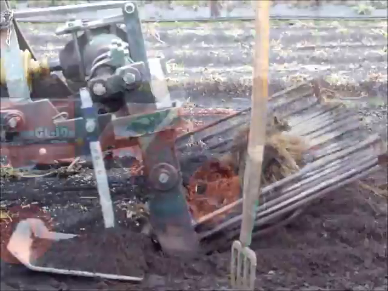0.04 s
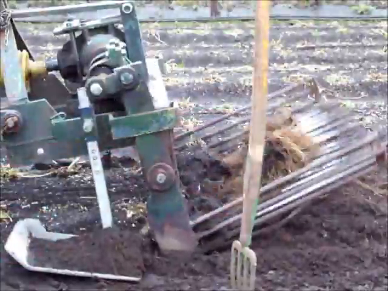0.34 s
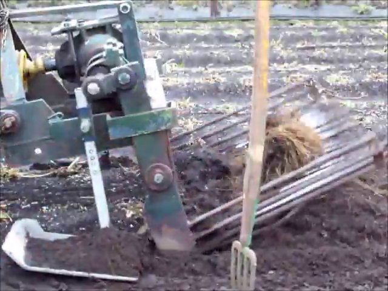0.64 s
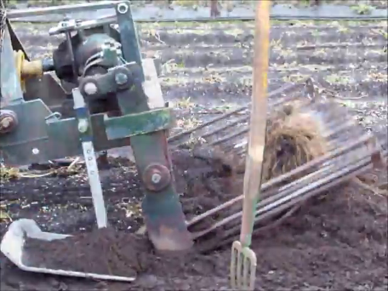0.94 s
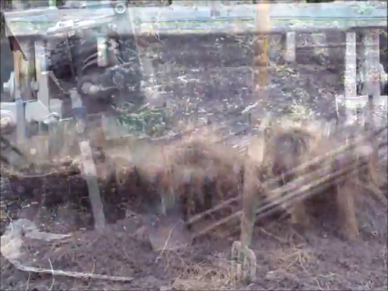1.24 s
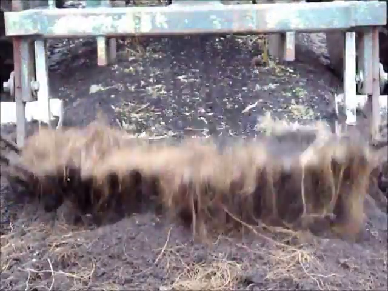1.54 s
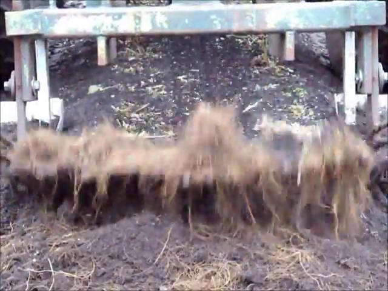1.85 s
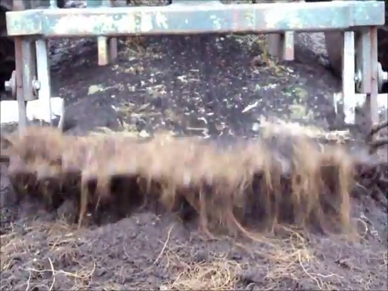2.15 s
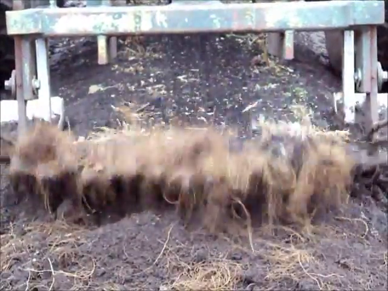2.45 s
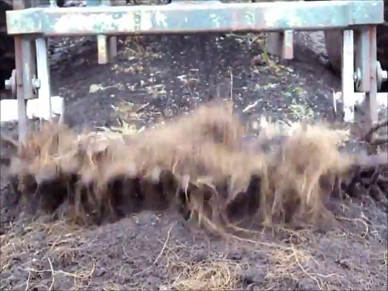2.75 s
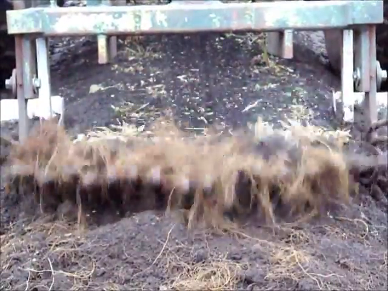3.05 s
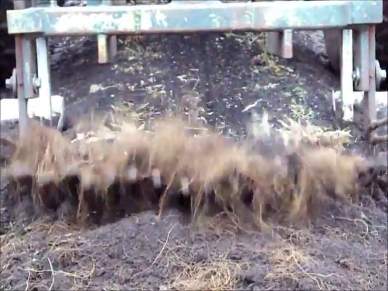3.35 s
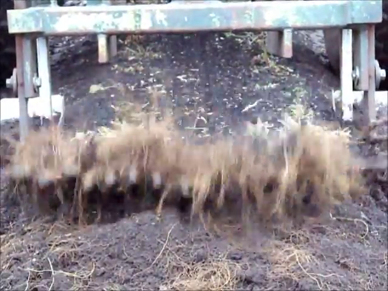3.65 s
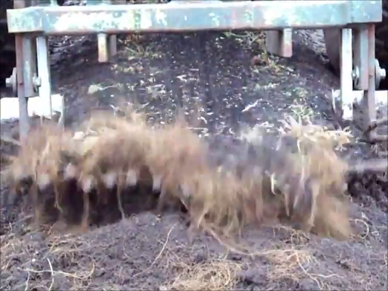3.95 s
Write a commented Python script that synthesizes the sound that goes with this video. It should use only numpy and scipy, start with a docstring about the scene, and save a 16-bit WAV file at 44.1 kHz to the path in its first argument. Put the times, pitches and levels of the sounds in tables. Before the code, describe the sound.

Rhythmic steel rattling from a farm machine sifting soil outdoors, each quick stroke ending in a hard clank. Loose pins clink over a low tractor drone and rumble, while wind thumps the microphone about a second in.

```python
"""A tractor pulls a plant lifter through a field, heard first from the side. A crank throws a grate of
steel tines up and down about three times a second, each stroke a rush of rattling steel and soil, while
the diesel drones below and wind rumbles. Loose pins clink, and the slack linkage ends each stroke with a
sharp slam. From 0.9 s the machine is also heard from behind, and after 1.5 s only from there.
Wind bumps the microphone, hardest around 1.3 s."""
import sys
import numpy as np
from scipy import signal
from scipy.fft import rfft, irfft
from scipy.io import wavfile

SR = 44100
rng = np.random.default_rng(int(sys.argv[2]) if len(sys.argv) > 2 else 0)


def unload_audio(sound):
    """Save the sound as a 16-bit wav file, at the path given as the first command line argument."""
    columns = np.transpose(np.atleast_2d(sound))
    # keep every value between -1 and 1, then stretch to whole-number steps
    steps = np.round(np.clip(columns, -1, 1) * 32767)
    wavfile.write(sys.argv[1], SR, steps.astype(np.int16))


N = 176400
T = np.arange(N) / SR
STROKE_S, ENGINE_HZ = .3036, 24.23   # engine: one cycle of all cylinders


def from_db(db):
    """Decibels to gain."""
    return 10 ** (np.asarray(db) / 20)


def rms_one(x):
    """Scale to unit power."""
    return x / np.sqrt(np.mean(x ** 2) + 1e-20)


def curve(rows, at=T):
    """Gains of each dB column, joined by straight lines."""
    s, *columns = np.transpose(rows)
    return [from_db(np.interp(at, s, c)) for c in columns]


def shape_spectrum(x, points):
    """Filter by a smooth (Hz, dB) curve; rms 1."""
    hz, db = np.transpose(points)
    bins_hz = np.maximum(np.arange(N // 2 + 1) * SR / N, 1)
    gain = from_db(np.interp(np.log(bins_hz), np.log(hz), db))
    return rms_one(irfft(rfft(x) * gain, N))


def slow_drift(rate_hz):
    """Slow random wander, rms about 1."""
    r = np.exp(-80 * np.pi * rate_hz / SR)
    slow = signal.lfilter([1], [1, -2 * r, r * r], rng.standard_normal(N // 40 + 2002))[2000:]
    return np.interp(np.arange(N) / 40, np.arange(len(slow)), rms_one(slow))


def one_mode(x, hz, width_hz):
    """One resonance, peak gain 1."""
    r = np.exp(-np.pi * width_hz / SR)
    feedback = [1, -2 * r * np.cos(2 * np.pi * hz / SR), r * r]
    return signal.lfilter(np.array([1, 0, -1]) * (1 - r * r) / 2, feedback, x + 1e-18)


def contacts(per_s, spread_db):
    """Random clicks, many small and a few large."""
    sizes = from_db(spread_db * np.minimum(rng.exponential(1, N), 4))
    return (rng.random(N) < per_s / SR) * sizes * rng.choice([-1, 1], N)


def burst(s, rise_s, decay_s):
    """Envelope that climbs from time s and dies away."""
    age = T - s
    return np.clip(age / rise_s, 0, 1) * np.exp(-np.clip((age - rise_s) / decay_s, 0, 30))


def steel_ring(modes, force, per_s):
    """Dense contacts ring each mode of a steel part; rms 1."""
    out = 0
    for hz, db in modes:
        hits = force * contacts(per_s, spread_db=2.5)
        out += from_db(db) * rms_one(one_mode(hits, hz, width_hz=75))
    return rms_one(out)


def load_jolts(decay_s=.0053):
    """Small impacts shake the load: a gain that leaps and sinks back; rms 1."""
    kicks = contacts(per_s=97, spread_db=2)
    energy = signal.lfilter([1], [1, -np.exp(-2 / (decay_s * SR))], kicks ** 2 + 1e-18)
    return rms_one(1 + .76 * np.sqrt(energy))


# Spectrum of rattling steel. Each row: frequency in Hz, relative level in dB.
RATTLE_SPECTRUM = [(1000, -28.5), (2600, -8), (3300, -7.5), (4200, -9), (5000, -5), (6200, -3.5),
                   (7200, -3.5), (7700, -4.5), (8200, -12), (9500, -49.5)]
# Tine resonances. Each row: frequency in Hz, relative level in dB.
TINE_RESONANCES = [(3290, -13), (3465, -8.5), (4010, -14), (4860, -15), (6500, -13), (6870, -10), (7115, 2),
                   (7290, -11)]


def steel_rattle(side, rear, jolt):
    """Loose parts jingle, grit scours, tines ring; the side hears more jingle, less of the rest."""
    def force(side_db):
        return np.hypot(side * from_db(side_db), rear)

    pitches_hz = np.linspace(3400, 7900, num=24)
    hits_per_s, ring_cycles = 600 / len(pitches_hz), 75
    parts = 0
    for hz in pitches_hz:
        parts += one_mode(contacts(hits_per_s, spread_db=3), hz, width_hz=2.04 * hz / ring_cycles)
    jingle = from_db(-29) * force(side_db=1) * shape_spectrum(parts, RATTLE_SPECTRUM)
    scouring = force(side_db=-1.5) ** 1.38   # grows faster than the force, so drops out between strokes
    grit = from_db(-28) * scouring * jolt * shape_spectrum(contacts(7000, spread_db=3), RATTLE_SPECTRUM)
    tines = from_db(-30) * steel_ring(TINE_RESONANCES, jolt * force(side_db=-11), per_s=160)
    return jingle + grit + tines


# Spectrum of frame and clods. Each row: frequency in Hz, relative level in dB.
CLATTER_SPECTRUM = [(150, -13.5), (320, -5.5), (550, 0.5), (800, -2.5), (1200, -0.5), (1900, -2.5),
                    (2650, -9), (3300, -9.5), (5000, -9.5), (8000, -17)]
# Frame resonances. Each row: frequency in Hz, relative level in dB.
FRAME_RESONANCES = [(551, -1), (686, -1.5), (903, -5.5), (1187, -3), (1497, 1), (1802, 1.5), (1940, -1.5),
                    (2212, -3.5)]


def frame_clatter(side, rear, jolt):
    """Clods clatter and the frame rings, pulsing slightly with the diesel's knock."""
    diesel_knock = 1 + .11 * np.cos(2 * np.pi * ENGINE_HZ * T)
    force = np.hypot(side, rear) * jolt ** .63 * diesel_knock
    clatter = from_db(-29.5) * force * shape_spectrum(contacts(4000, spread_db=3), CLATTER_SPECTRUM)
    return clatter + from_db(-35) * steel_ring(FRAME_RESONANCES, force, per_s=500)


# Machine level from the side and from behind. Each row: time in seconds, relative level in dB.
SIDE_FADE = [(0, 5), (.19, 5), (.24, -0.5), (.85, 0), (1.2, 0.5), (1.45, 1), (1.56, -30), (4, -60)]
REAR_FADE = [(0, -59), (.865, -38), (.89, 3), (1.2, 1), (1.7, 1), (2.5, 1), (3.3, 0.5), (4, -1)]
# One stroke at each position. Each row: seconds after the slam, steel in dB, frame and soil in dB.
SIDE_CYCLE = [(0, 4.5, -1.5), (.015, 0.5, -1.5), (.045, -5, -4), (.065, -1, -0.5), (.09, -4, -0.5),
              (.125, -1.5, 0), (.15, 0, 1.5), (.2, -1, 1.5), (.228, -1.5, 0.5), (.255, -5.5, -3),
              (.285, 0, 3), (.304, -1, 6.5)]
REAR_CYCLE = [(0, 3, -2.5), (.012, -2.5, -6), (.025, -1.5, -3), (.055, -6.5, -6.5), (.092, -3, -2.5),
              (.102, 3.5, 2), (.118, 3, 2), (.138, 0, -1.5), (.153, 1.5, 0.5), (.17, -0.5, -2), (.21, 2, 0),
              (.224, 0, -1.5), (.24, 1, -1), (.268, -3, -1.5), (.283, 5, 5), (.3, -2.5, 0)]


def grate():
    """The crank shakes steel, frame and soil with each stroke; side and rear add in power."""
    def stroke_forces(fade, cycle, slam_s):
        return curve(fade)[0] * np.array(curve(cycle, (T - slam_s) % STROKE_S))

    side_steel, side_frame = stroke_forces(SIDE_FADE, SIDE_CYCLE, slam_s=.214)
    rear_steel, rear_frame = stroke_forces(REAR_FADE, REAR_CYCLE, slam_s=.895)
    jolt = load_jolts()
    return steel_rattle(side_steel, rear_steel, jolt) + frame_clatter(side_frame, rear_frame, jolt)


# Diesel orders. Each row: multiple of ENGINE_HZ, level at the side in dB, level behind in dB.
ENGINE_ORDERS = [(1, -41.5, -43.5), (2, -45.5, -60), (3, -35, -42.5), (4, -32.5, -60.5), (5, -43, -62),
                 (8, -44, -63)]


def engine(first_chug_s=.0155, waver_s=.00026):
    """Low orders of the diesel at steady speed, in phase so that it chugs once a cycle."""
    phase = 2 * np.pi * ENGINE_HZ * (T - first_chug_s + waver_s * slow_drift(4.1))
    side, rear = np.minimum(curve(SIDE_FADE)[0], 1), curve(REAR_FADE)[0]
    drone = 0
    for order, side_db, rear_db in ENGINE_ORDERS:
        gain = np.hypot(side * from_db(side_db), rear * from_db(rear_db))
        drone += gain * from_db(.96 * slow_drift(7.3)) * np.cos(order * phase)
    return np.sqrt(2) * from_db(1.7 * slow_drift(6)) * drone


# Strength of the rumble. Each row: time in seconds, level in dB.
RUMBLE_FADE = [(0, -32.5), (.8, -36), (1.15, -32), (1.7, -32), (2.05, -32.5), (2.3, -36.5), (2.9, -37.5),
               (3.18, -33), (3.3, -38), (4, -37.5)]
# Spectrum of the rumble. Each row: frequency in Hz, relative level in dB.
RUMBLE_SPECTRUM = [(12, -14.5), (35, 0), (70, 0), (130, -0.5), (220, -5), (320, -14.5), (600, -16),
                   (2000, -44.5)]


def field_rumble():
    """Ground rumble and light wind: low, lumpy noise."""
    lumps = from_db(2.3 * slow_drift(13.3))
    return curve(RUMBLE_FADE)[0] * lumps * shape_spectrum(rng.standard_normal(N), RUMBLE_SPECTRUM)


# Spectrum of a steel impact. Each row: frequency in Hz, relative level in dB.
IMPACT_SPECTRUM = [(200, -34), (700, -25), (1800, -11.5), (2600, -11.5), (3500, -8), (5000, -6.5),
                   (6500, -1), (7400, -2.5), (8200, -10), (9500, -50)]


def steel_chatter():
    """Two hard faces meet in contacts too fast to count; rms 1."""
    return shape_spectrum(rng.choice([-1., 1.], N), IMPACT_SPECTRUM)


# Strikes of loose pins and tines. Each row: start in seconds, relative level in dB, ring in Hz.
PIN_STRIKES = [(0.0416, -5, 4300), (0.112, -6, 7370), (0.3097, -0.5, 7060), (0.3401, -11, 5200),
               (0.3615, -8, 6690), (0.3748, -5, 4990), (0.407, -9, 4700), (0.4215, -8, 5140),
               (0.4375, -7, 6700), (0.4648, -6, 5160), (0.4838, -8, 6500), (0.507, -2.5, 6070),
               (0.59, -6, 5150), (0.612, -1, 6840), (0.6476, -8, 5420), (0.6639, -8, 7050),
               (0.7106, -4.5, 7150), (0.7242, -4, 4190), (0.7429, -3, 6700), (0.832, -5, 6500),
               (0.8827, -3, 7230), (0.914, -4, 7200), (0.966, -4, 5120), (0.9996, -10, 7250),
               (1.0129, 3, 6420), (1.0465, 0.5, 6870), (1.082, -2.5, 7200), (1.149, -7, 7000),
               (1.179, -3, 6900), (1.2191, -2.5, 6860), (1.348, -14, 6500), (1.3934, -6, 5550),
               (1.423, -3, 6290), (1.6003, -5.5, 7260), (1.615, -6, 7230), (1.6532, -2, 7220),
               (1.711, -3, 6900), (1.757, -5, 7110), (1.9064, -6, 7270), (1.957, 0, 7030),
               (2.013, -7, 5520), (2.182, -6, 6810), (2.2116, -4, 7360), (2.2603, -2.5, 6890),
               (2.5142, -3.5, 7250), (2.5652, -3, 7120), (2.622, -6.5, 5390), (2.652, -6, 7070),
               (2.707, -1.5, 6520), (2.736, -9, 6530), (2.8676, -3, 7080), (3.173, -1, 7270),
               (3.256, -8, 7070), (3.424, -7, 7090), (3.476, -10, 7140), (3.857, -6, 7080)]


def clinks(rise_s=.00046, mode_gap_hz=267):
    """Steel strikes steel; each strike rings two close modes of a small part."""
    chatter, out = steel_chatter(), 0
    for start_s, db, hz in PIN_STRIKES:
        strike = from_db(-10.5) * chatter * burst(start_s, rise_s, decay_s=.0027)
        upper = np.sin(2 * np.pi * hz * (T - start_s))
        lower = .5 * np.sin(2 * np.pi * (hz - mode_gap_hz) * T + rng.uniform(0, 2 * np.pi))
        ping = from_db(-8.7) * (upper + lower) * burst(start_s, rise_s, decay_s=.004)
        out += from_db(db) * (strike + ping)
    return out


# Slams at the stroke ends. Each row: time in seconds, relative level in dB.
LINKAGE_SLAMS = [(0.2131, -3.5), (0.5128, -5), (0.818, -6.5), (0.8949, -1), (1.1204, -5.5), (1.1976, -2),
                 (1.4974, -0.5), (1.805, -3.5), (2.1084, 0.5), (2.4118, -1), (2.715, -2.5), (3.02, -2.5),
                 (3.3235, -0.5), (3.6258, -3), (3.931, -3)]


def slams(rise_s=.0012, decay_s=.0022):
    """The linkage takes up its slack: a soft knock as the grate slows, a touch, then a hard slam."""
    force = 0
    for slam_s, db in LINKAGE_SLAMS:
        knock = from_db(-10) * burst(slam_s - .02, rise_s, decay_s=.0086)
        touch = from_db(-4.5) * burst(slam_s - .0036, rise_s, decay_s)
        slam = burst(slam_s, rise_s, decay_s)
        crack = from_db(-7.5) * burst(slam_s, rise_s, decay_s=.00047)
        force += from_db(db) * (knock + touch + slam + crack)
    return from_db(-7.5) * force * steel_chatter()


# Thumps of air. Each row: start in seconds, level in dB, starting pitch in Hz.
AIR_THUMPS = [(0.334, -20, 96), (1.29, -8, 118), (1.316, -11.5, 200), (1.423, -11, 210),
              (1.558, -10.5, 185), (3.060, -13, 196)]


def air_thumps(sag_s=.008, end_ratio=.33):
    """Air hits the microphone: round, low blows whose pitch falls as they die."""
    out = 0
    for start_s, db, hz in AIR_THUMPS:
        age = np.maximum(T - start_s, 0)
        cycles = hz * (end_ratio * age + (1 - end_ratio) * sag_s * (1 - np.exp(-age / sag_s)))
        out += from_db(db) * burst(start_s, rise_s=.0029, decay_s=.011) * np.sin(2 * np.pi * cycles)
    return out


# Wind buffets. Each row: start in seconds, level in dB, decay in seconds.
WIND_BUFFETS = [(1.255, -20.5, 0.042), (1.285, -13.5, 0.027), (1.316, -15, 0.026), (1.367, -20, 0.028),
                (1.395, -19, 0.015), (1.423, -21, 0.047), (1.77, -31.5, 0.017), (3.165, -31, 0.017)]
# Spectrum of a buffet. Each row: frequency in Hz, relative level in dB.
BUFFET_SPECTRUM = [(12, -17), (35, -5.5), (70, -1), (140, -6), (230, -8.5), (360, -11.5), (550, -22.5),
                   (1000, -30.5), (3000, -58.5)]


def wind_buffets(rise_s=.0088):
    """Wind buffets the microphone in short bursts of low noise."""
    gusts = sum(from_db(db) * burst(start_s, rise_s, decay_s) for start_s, db, decay_s in WIND_BUFFETS)
    return gusts * shape_spectrum(rng.standard_normal(N), BUFFET_SPECTRUM)


def scene():
    """Machine and wind in the open field, mono."""
    return (grate() + engine() + field_rumble() + clinks() + slams() + air_thumps() + wind_buffets())[None]


def record(dry):
    """Slightly hollow microphone, narrow-band recorder; the hardest clanks clip and splash treble."""
    band_edge_hz, cutoff_hz = 8750, 16000
    hollow = dry - .32 * one_mode(dry, hz=2656, width_hz=250)
    narrow = signal.sosfilt(signal.cheby2(16, 70, band_edge_hz, fs=SR, output="sos"), hollow)
    clipped = np.clip(narrow, -.93, .93)
    return signal.sosfilt(signal.cheby2(16, 70, cutoff_hz, fs=SR, output="sos"), clipped)


dry = scene()
out = record(dry)
unload_audio(out)
```